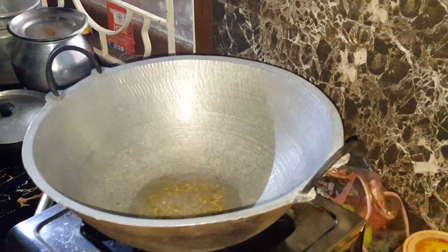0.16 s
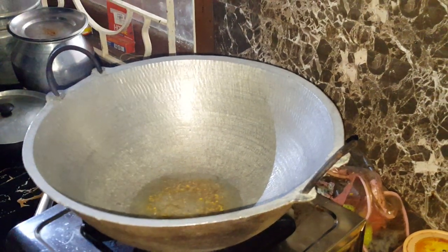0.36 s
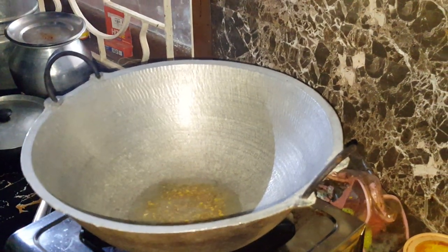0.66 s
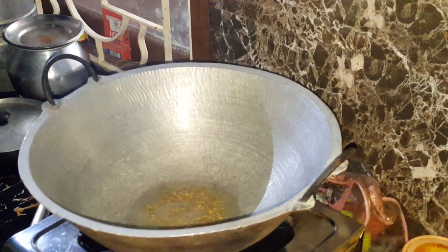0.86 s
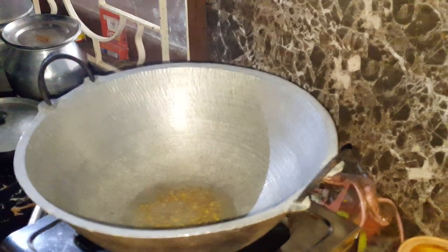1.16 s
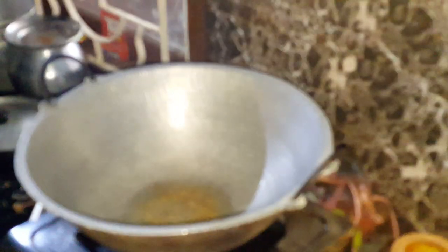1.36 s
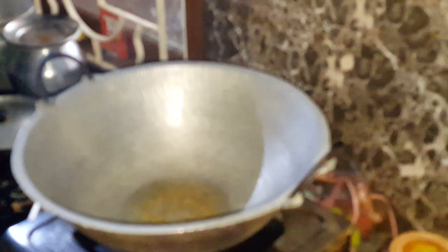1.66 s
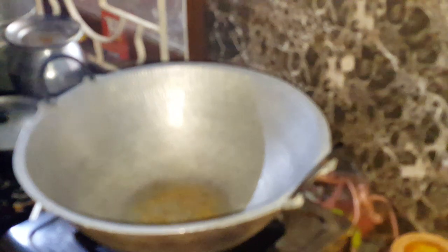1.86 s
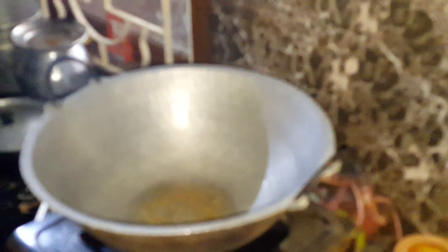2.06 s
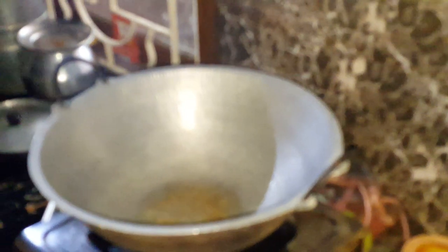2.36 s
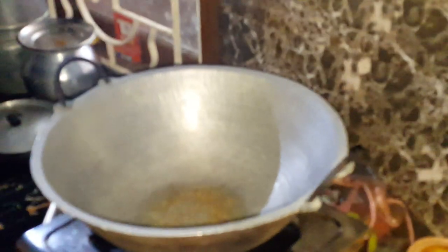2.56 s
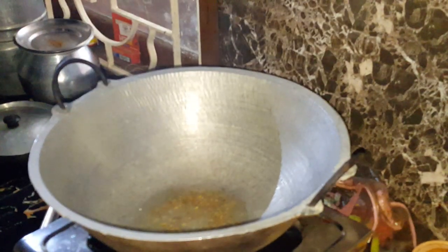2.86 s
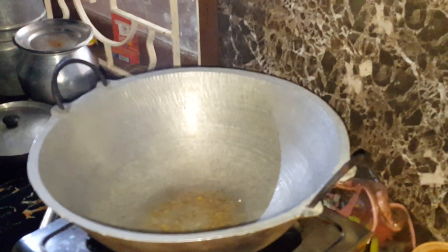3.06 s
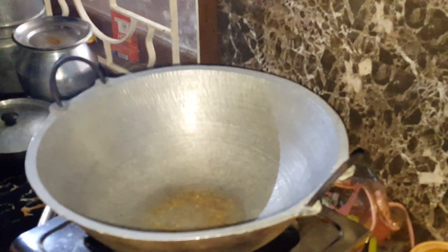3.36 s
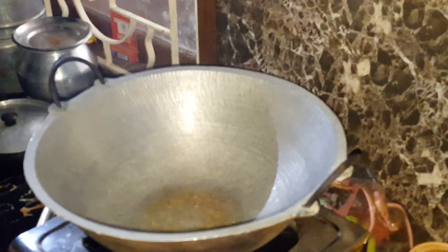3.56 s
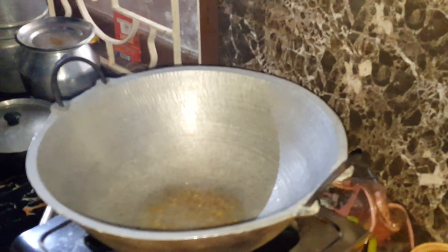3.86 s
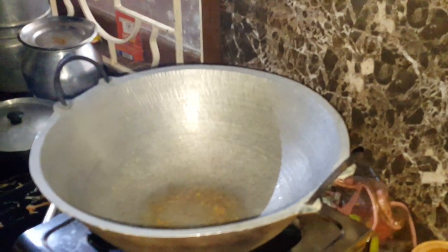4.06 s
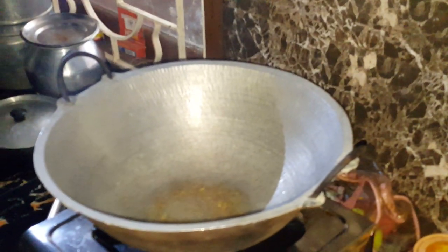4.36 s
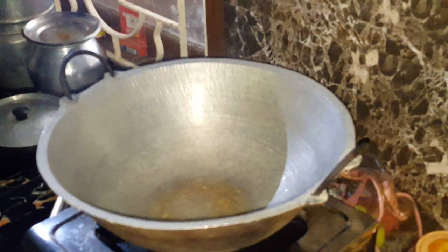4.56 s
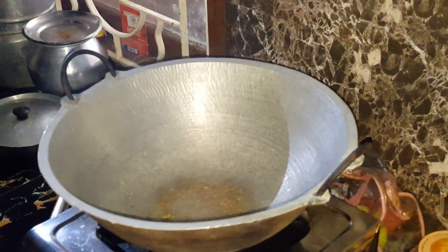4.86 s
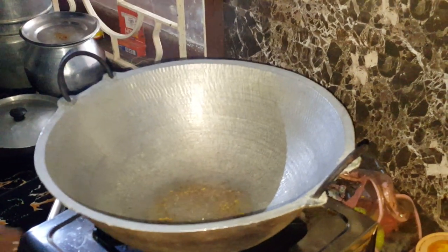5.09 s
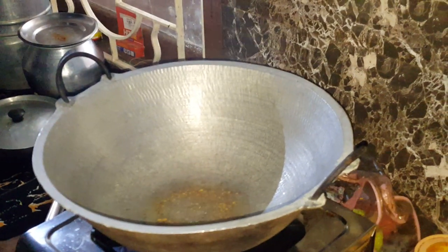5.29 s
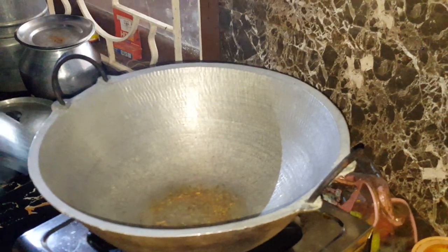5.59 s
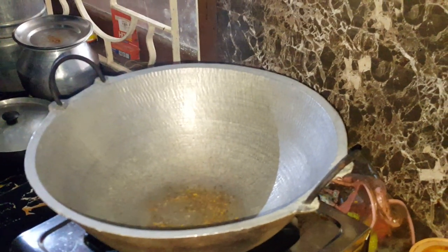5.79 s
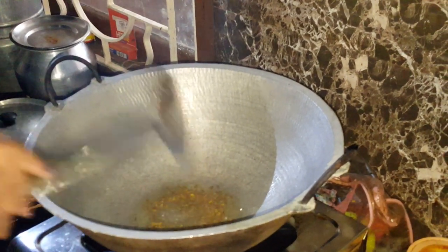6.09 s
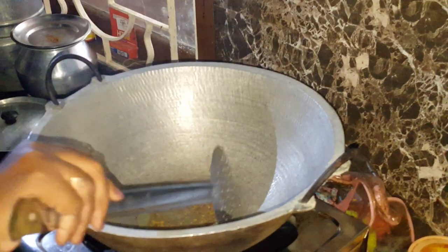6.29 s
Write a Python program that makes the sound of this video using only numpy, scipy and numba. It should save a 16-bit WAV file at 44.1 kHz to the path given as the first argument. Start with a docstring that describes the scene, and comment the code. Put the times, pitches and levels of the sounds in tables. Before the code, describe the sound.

Close in a small hard-walled kitchen, seeds splutter in hot oil in a wide metal pan. A few scattered spits come first, with a dull bump far off, then the crackle thickens into constant bright pops over fine sizzle. A faint wavering whistle joins midway. The popping eases slightly before a ladle knocks the pan at the very end. Soft gas flame and room air lie underneath; the phone microphone is just above the rim.

```python
"""Seeds spluttering in hot oil

Steam bubbles burst as short pitched spits over a swarm of finer sizzle: damped sines with sharp cracks.
Husks pop as dull pressure pulses, the oil gurgles once, and bowl and tiled walls smear each burst in noise.
A ladle strikes the pan's ringing modes at the end; behind lie a far bump, a narrow wavering whistle,
and the gas flame and kitchen air as coloured noise. A phone above the rim rounds the peaks."""
import sys
import numpy as np
from scipy import signal
from scipy.fft import rfft, irfft, next_fast_len
from scipy.io import wavfile
from scipy.ndimage import uniform_filter1d
from numba import njit

SR = 44100
rng = np.random.default_rng(int(sys.argv[2]) if len(sys.argv) > 2 else 0)


def generate_wav(sig):
    """Save sig (samples, or channels by samples) to the path in sys.argv[1] as 16-bit PCM at SR."""
    pcm = np.round(np.clip(np.atleast_2d(sig).T, -1, 1) * 32767).astype(np.int16)
    wavfile.write(sys.argv[1], SR, pcm)


N = 283563

# clearest bursting steam bubbles, before the size ceiling and gains:
# start_s [s], level_db [dB], pitch_hz [Hz], crack_db [dB relative to the blip]
CLEAR_BURSTS = [(0.063, -32.5, 4290, -12), (0.0842, -47, 4330, -24), (0.2567, -17.5, 2460, -21),
                (0.3364, -10, 4760, -8.5), (0.4449, -16.5, 2250, -29), (0.4656, -12, 4600, -20),
                (0.4882, -17, 5800, -14), (0.5186, -12.5, 8440, -21), (0.637, -16, 10000, -2.5),
                (0.7148, -25.5, 9310, 5.5), (0.8873, -15, 2200, 0.5), (1.0077, -19, 5360, -13),
                (1.068, -17, 5300, -19), (1.108, -20, 5600, -11), (1.1309, -23, 5600, 5.5),
                (1.1806, -17, 4270, -12), (1.2047, -19, 5700, -8), (1.2333, -14, 5000, 1),
                (1.273, -7.5, 4450, -31), (1.3551, -17, 5650, 0), (1.4115, -13, 5000, -6),
                (1.4385, -12.5, 4650, -8), (1.4635, -15, 8900, 2), (1.511, -16.5, 4420, -22),
                (1.5622, -12, 3980, -27), (1.608, -11, 4440, -20), (1.6205, -11.5, 4400, -17),
                (1.6916, -15, 5540, -15), (1.721, -16, 4830, -21), (1.7699, -11.5, 4630, -14),
                (1.8367, -13, 4640, -19), (1.862, -11, 4670, -6), (1.918, -10, 4480, -13),
                (1.9649, -13, 4060, -19), (1.9928, -14, 4630, -3), (2.0184, -9.5, 5070, -6),
                (2.062, -10.5, 4700, -19), (2.078, -10, 5250, -21), (2.136, -8, 4430, -16),
                (2.165, -15.5, 4640, -19), (2.183, -14, 4560, -23), (2.248, -9.5, 4200, -2.5),
                (2.2948, -13.5, 4880, -7), (2.319, -22, 4100, -30), (2.3558, -6.5, 4400, -23),
                (2.4513, -16, 4310, -30), (2.518, -20, 4900, -28), (2.537, -5.5, 3970, -21),
                (2.574, -20, 4400, -23), (2.59, -14.5, 4950, -9), (2.615, -21, 5350, 4.5),
                (2.7077, -13.5, 4430, -22), (2.7272, -8, 4490, -12), (2.7417, -8, 4650, -19),
                (2.806, -17, 3100, -19), (2.8247, -15.5, 4600, -7), (2.883, -20, 4990, -4),
                (2.9035, -9.5, 4670, -7), (2.9275, -8, 3880, -17), (3.009, -11, 4400, -20),
                (3.039, -5.5, 4380, -35), (3.0735, -6.5, 4510, -17), (3.1176, -15, 6210, -12),
                (3.1804, -12, 4960, -29), (3.1921, -9.5, 4500, -11), (3.2963, -19.5, 4470, -29),
                (3.333, -9.5, 4360, -27), (3.3662, -9, 5460, -19), (3.3857, -19, 4520, -10),
                (3.4554, -6, 4600, -18), (3.5024, -13, 4170, -17), (3.5496, -30, 4540, -27),
                (3.5683, -13, 2980, -0.5), (3.6022, -11.5, 4260, -18), (3.636, -14.5, 4470, -13),
                (3.683, -13, 4360, -5), (3.721, -12.5, 4360, -18), (3.7893, -13, 5010, -9),
                (3.8072, -13.5, 4130, -17), (3.8513, -20, 2900, -3), (3.8681, -16, 4260, -4),
                (3.899, -19, 3780, -17), (3.92, -13, 4470, -14), (3.9436, -14, 4460, -6),
                (3.9716, -5, 4730, -15), (4.097, -12.5, 3050, -8), (4.1157, -15, 4930, -29),
                (4.1305, -14, 4300, -22), (4.196, -23, 4300, -29), (4.214, -1, 3000, -24),
                (4.268, -16.5, 5290, -19), (4.3196, -10.5, 4430, -11), (4.3705, -16, 5080, -20),
                (4.434, -17, 4330, -22), (4.4578, -13, 4490, -13), (4.4709, -13, 2960, -20),
                (4.5027, -23, 4430, -25), (4.5248, -9.5, 4400, -6), (4.585, -10.5, 2760, -26),
                (4.6532, -17, 4130, -15), (4.6866, -9.5, 4220, -16), (4.7145, -36, 4500, -7),
                (4.7696, -15, 2880, -21), (4.816, -11, 4080, 2), (4.8574, -12.5, 4290, -5),
                (4.8924, -10, 4620, -14), (4.9208, -10, 4200, -27), (5.016, -9, 3100, -30),
                (5.0729, -9.5, 4800, -25), (5.1208, -10, 5170, -9), (5.1854, -21.5, 4600, 8),
                (5.2151, -16.5, 4460, -2), (5.256, -13.5, 4540, -10), (5.2904, -19, 2890, -24),
                (5.3154, -12.5, 3200, -12), (5.3464, -17.5, 2880, -8), (5.4445, -13.5, 4230, -19),
                (5.4717, -14, 4800, -17), (5.5032, -11, 4200, -16), (5.556, -18, 4300, -28),
                (5.5958, -14, 4430, -19), (5.6368, -14, 4560, -18), (5.7176, -17.5, 5240, -14),
                (5.745, -12, 3780, -7), (5.8158, -17, 4290, -13), (5.864, -20, 4700, 0),
                (5.885, -16.5, 3000, -5.5), (5.9158, -24, 2980, 4.5), (5.9618, -23, 4280, -24),
                (5.9744, -9, 3900, -12), (6.0432, -11, 4260, -5), (6.096, -21.5, 4530, -25),
                (6.1854, -18.5, 3840, -36), (6.2164, -13.5, 4230, -22), (6.3237, -19.5, 3060, -20)]
# level of the sizzling swarm under the spits, before stirring and gains:
# time_s [s], level_db [dB], treble_db [dB relative to body]
SWARM_LEVEL = [(0.0, -20.5, -14), (0.25, -44.5, 6.5), (0.5, -40, 1.5), (0.75, -52, 14.5), (0.93, -33.5, -3),
               (1.12, -55, 14), (1.43, -40, 8), (2.17, -29.5, -1.5), (2.99, -29.5, -2), (4.06, -27.5, -5.5),
               (4.75, -28, -4.5), (5.5, -31.5, -6), (6.2, -36.5, -3), (6.43, -29, -16)]
# ladle on the wall, then its rattles, before gains: start_s [s], level_db [dB]
LADLE_TOUCHES = [(6.349, -21.5), (6.353, -35), (6.357, -42), (6.366, -36)]
# colour of bowl mouth and microphone: freq_hz [Hz], gain_db [dB]
BOWL_COLOUR = [(100, -5), (1000, -3), (2000, -4.5), (3000, 0.5), (3600, -2.5), (4500, 4.5), (5500, 4),
               (7000, 1.5), (8800, 7), (10200, -1.5), (13000, 2), (16000, -2.5)]

BIGGEST_DB = -7  # ceiling on all bursts, before gains
RIGHT_LAG = 2  # samples by which the right channel trails for a centred sound
SIDES = np.array([[1], [-1]])  # opposite signs left and right


def undb(db):
    """Decibels to amplitude."""
    return 10 ** (np.asarray(db) / 20)


def curve(table):
    """Columns of a table joined over time."""
    s, *columns = np.transpose(table)
    return [np.interp(np.arange(N) / SR, s, c) for c in columns]


def unit(x):
    """Scales to an RMS of one."""
    return x / np.sqrt(np.mean(x ** 2))


def colour(x, points):
    """Weights the spectrum by (Hz, dB) points joined over log frequency."""
    hz, db = np.transpose(points)
    n = next_fast_len(x.shape[-1] + SR // 4)
    f = np.maximum(np.arange(n // 2 + 1) * SR / n, 1)
    gain = undb(np.interp(np.log(f), np.log(hz), db))
    return irfft(rfft(x, n) * gain, n)[..., :x.shape[-1]]


def butter(x, order, hz, kind):
    """Butterworth filter."""
    return signal.sosfilt(signal.butter(order, hz, kind, fs=SR, output="sos"), x)


def ring(x, hz, t60):
    """One damped mode, falling 60 dB in t60 seconds."""
    p = np.exp(2j * np.pi * hz / SR - np.log(1000) / (t60 * SR))
    return signal.lfilter([1], [1, -p], x).imag


def hiss(hz, width_hz):
    """Noise in one resonance."""
    return unit(ring(rng.standard_normal(N), hz, np.log(1000) / (np.pi * width_hz)))


def logit_scatter(u):
    """Turns uniform chance into a centred, bell-like scatter."""
    return np.log((u + .02) / (1.02 - u)) / 2


def fading(at, db, tau_s):
    """Power that jumps at each event and dies away."""
    x = np.zeros(N)
    np.add.at(x, (np.asarray(at) * SR).astype(int), undb(2 * np.asarray(db)))
    return signal.lfilter([1], [1, -np.exp(-1 / (tau_s * SR))], x)


def pushes(table, width_s):
    """One-sided pressure pulses, each peaking width_s after its start."""
    x = np.zeros(N)
    at, db = np.transpose(table)
    np.add.at(x, (at * SR).astype(int), undb(db))
    t = np.arange(SR // 100) / (SR * width_s)
    return np.convolve(x, t * np.exp(1 - t))[:N]


@njit
def grains(at, hz, cycles, rise, lag, left, right, n, sr):
    """Damped sines that swell over some cycles, last a few more and climb in pitch as the bubble opens."""
    out = np.zeros((2, n + 16))
    for k in range(len(at)):
        i = int(at[k] * sr)
        w, a, shut, phase = 2 * np.pi * hz[k] / sr, 1., 1., 0.
        fade = np.exp(-hz[k] / (cycles[k] * sr))
        opening = np.exp(-hz[k] / (rise * sr))
        while a > .003 and 4 <= i < n:
            v = (a - shut) * np.sin(phase)
            out[0, i] += left[k] * v
            out[1, i + lag[k]] += right[k] * v
            phase += w
            w = min(w * 1.001, 2.7)  # pitch climbs 0.1 % a sample up to a limit
            a *= fade
            shut *= opening
            i += 1
    return out[:, :n]


def bubbles(at, hz, db, place, cycles, rise):
    """Grains placed across the oil, 0 (right) to 1 (left), by level balance and delay between the ears."""
    pan_db = -1.5 + 8 * (place - .5)
    lag = np.round(RIGHT_LAG + 5 * (place - .5)).astype(np.int64)
    hz = np.clip(hz, 100, .42 * SR)
    left, right = undb(db + pan_db / 2), undb(db - pan_db / 2)
    return grains(at, hz, cycles + 0 * at, max(rise, .01), lag, left, right, N, 1. * SR)


def stirring():
    """Each clear burst stirs up small bubbles for a while; the swarm calms in the pauses."""
    stir_s, stir_power = 0.026, 0.2
    at, db = np.transpose(CLEAR_BURSTS)[:2]
    recent = fading(at, np.minimum(db, BIGGEST_DB), stir_s) + 1e-6
    return (recent / uniform_filter1d(recent, SR // 2)) ** stir_power


def bursts():
    """The clear bursts, the smaller one each sets off, and lesser ones that fall by chance."""
    follows_s, follower_db = .025, -8  # typical delay, level below the clear burst
    lesser_per_s, lesser_db, lesser_spread_db = 11, 10.5, 4  # rate, size over the swarm level, scatter
    lesser_hz, lesser_octaves = 4020, 0.32  # usual pitch and its scatter

    def crack_db(chance):
        return -13 + 4 * logit_scatter(chance)

    at, db, hz, _ = np.transpose(CLEAR_BURSTS)
    late, size, tune, crack = rng.random((len(at), 4)).T
    follower = [at + follows_s * (.4 + late),
                np.minimum(db, BIGGEST_DB) + follower_db + 3.3 * logit_scatter(size),
                np.minimum(hz, lesser_hz) * 2 ** (0.18 * logit_scatter(tune)),
                crack_db(crack)]

    when, size, tune, crack = rng.random((int(lesser_per_s * N / SR), 4)).T
    i = (when * (N - 1)).astype(int)
    db = curve(SWARM_LEVEL)[0][i] + 20 * np.log10(stirring()[i])  # size follows the swarm
    db = db + lesser_db - lesser_spread_db * np.log(size + 0.066)
    lesser = [i / SR, db, lesser_hz * 2 ** (lesser_octaves * logit_scatter(tune)), crack_db(crack)]
    return np.hstack([np.transpose(CLEAR_BURSTS), follower, lesser])


def spits():
    """Each burst is a pitched blip, a sharp crack with its bounce off the bowl, and droplets that fall back."""
    bounce_s = .0013
    at, db, hz, crack_db = bursts()
    db = np.minimum(db, BIGGEST_DB)
    crack_db = db + crack_db
    chance = rng.random((len(at), 21))
    place = chance[:, 0]
    out = bubbles(at, hz, db + 8, place, cycles=1.27 + 0.51 * chance[:, 1], rise=0.88)
    crack_hz = 7000 + 5000 * chance[:, 2]
    out += bubbles(at, crack_hz, crack_db + 17.5, place, cycles=0.22, rise=0.035)
    bounce_hz = 8000 + 5000 * chance[:, 3]
    out += bubbles(at + bounce_s, bounce_hz, crack_db + 3.0, chance[:, 4], cycles=1.0, rise=.03)
    for k in range(4):  # droplets
        late, size, tune, place = chance[:, 5 + 4 * k:9 + 4 * k].T
        lands = at + bounce_s + 0.014 * late ** 2
        drop_hz = hz * 2 ** (0.98 * (tune - .5))
        out += bubbles(lands, drop_hz, db + 0.5 - 5 * size, place, cycles=1.27, rise=0.23)
    return out


def sizzle():
    """A dense swarm of small bubbles of scattered size, with finer cracks above."""
    bubbles_per_s, spread_db = 900, 3.5
    usual_hz, spread_octaves = 3910, 0.48
    db, treble_db = curve(SWARM_LEVEL)
    chance = rng.random((int(bubbles_per_s * N / SR), 6))
    at, place = chance[:, 0] * (N - 1) / SR, chance[:, 4]
    size_db = -spread_db * np.log(chance[:, 1] + 0.0087)
    octave = spread_octaves * 2.565 * (chance[:, 2] + chance[:, 3] - 1)
    body = bubbles(at, usual_hz * 2 ** octave, size_db, place, cycles=1.5, rise=0.99)
    crack_hz = 7500 + 7000 * chance[:, 5]
    cracks = bubbles(at, crack_hz, 1.92 * size_db, place, cycles=0.21, rise=0.049)
    return stirring() * undb(db - 3.5) * (unit(body) + undb(treble_db) * unit(cracks))


def gurgle():
    """A few large slow bubbles make a soft gurgle in the oil."""
    # large bubbles, before colouring: start_s [s], level_db [dB], pitch_hz [Hz]
    slow_bubbles = [(2.186, -20, 1010), (2.2, -20, 940), (2.245, -32, 424)]
    at, db, hz = np.transpose(slow_bubbles)
    return bubbles(at, hz, db, .5 + 0 * at, cycles=1.9, rise=0.24)


def husk_pops():
    """Splitting husks give dull pops: short one-sided pressure pulses."""
    # splitting husks, before a common gain: start_s [s], level_db [dB]
    splits = [(0.3369, -28), (0.5326, -21), (0.6374, -24), (0.7293, -22.5), (0.7957, -30.5), (1.2493, -24),
              (1.5237, -29.5), (1.5926, -27), (1.8621, -26), (2.044, -31), (2.1424, -21.5), (2.3914, -20),
              (2.6023, -20), (2.8119, -27), (2.8832, -31.5), (2.9051, -20), (3.0111, -20), (3.1934, -26.5),
              (3.5699, -26), (3.7017, -24), (3.8524, -26), (4.2373, -31), (4.5497, -22), (5.1198, -18),
              (5.7984, -25), (5.8567, -25), (5.8854, -14), (5.9762, -25), (6.0048, -23)]
    return undb(6.0) * pushes(splits, width_s=.000055)


def pan_wall(blows):
    """The pan's modes ring when driven; each leaves the wall in its own direction."""
    # modes of the pan wall: freq_hz [Hz], gain_db [dB], t60_s [s to fall 60 dB]
    modes = [(240.7, -22, 0.46), (357, -68, 0.58), (394.4, -11.5, 1), (498, -9, 0.99), (609, -2.5, 0.17),
             (619, -7.5, 0.81), (884, -9.5, 0.2), (990, -24, 0.29), (1390, -38, 0.26), (1950, -3, 0.059),
             (3000, -13, 0.098), (3670, -2, 0.099), (4220, 7.5, 0.071), (5670, -3, .04), (7400, 2, .04)]
    side_db = 4.0 * rng.standard_normal(len(modes))
    return sum(undb(db + s * SIDES / 2) * ring(blows, hz, t60) for (hz, db, t60), s in zip(modes, side_db))


def clatter(tau_s, db):
    """Noise that bursts at each touch of the ladle and fades."""
    power = fading(*np.transpose(LADLE_TOUCHES), tau_s)
    return np.sqrt(power) * rng.standard_normal((2, N)) * undb(db)


def pan_metal(boiling):
    """The boiling oil shakes the wall's low modes a little; the ladle hits it hard and scrapes on."""
    shaking = butter(boiling, 2, 900, "low")
    ladle = pushes(LADLE_TOUCHES, width_s=.00005)
    scrape = colour(clatter(tau_s=0.0062, db=0.0), BOWL_COLOUR)
    # the many close modes of the wall blur into a low rattle
    rattle = butter(clatter(tau_s=0.035, db=13.5), 2, [280, 900], "band")
    knock = ladle * undb(15)
    return pan_wall(ladle * undb(-11.5) + shaking * undb(-46.5)) + knock + scrape + rattle


def smear(x):
    """Dense echoes of bowl and walls: noise that follows the fading power of each band.

    Every burst sits elsewhere, so its echoes fall anew. The bass reaches both ears alike, the treble not."""
    size, hop = 192, 48  # samples
    frames = dict(fs=SR, nperseg=size, noverlap=size - hop)
    hz, _, z = signal.stft(x, **frames)
    power = 0
    for t60, db in (0.04, -7.5), (0.16, -3.5):  # bowl, then walls: s, dB
        keep = np.exp(-2 * np.log(1000) * hop / (t60 * SR))
        power = power + undb(2 * db) * signal.lfilter([0, 0, 1 - keep], [1, -keep], np.abs(z) ** 2)
    mid, side = signal.stft(rng.standard_normal((2, N)), **frames)[2]
    alike = .95 * np.exp(-hz / 900)[:, None]
    ears = np.array([np.sqrt(1 + alike) * mid + s * np.sqrt(1 - alike) * side for s in (1, -1)])
    echo = ears / np.sqrt(np.mean(np.abs(ears) ** 2)) * np.sqrt(power)
    return signal.istft(echo, **frames)[1][:, :N]


def bump():
    """A dull blow rooms away, heard mostly as ringing furniture and walls: swelling, fading resonant noise."""
    # resonances of the far blow, relative levels: freq_hz [Hz], width_hz [Hz], level_db [dB]
    resonances = [(126, 22, -35), (222, 23, -7), (259, 9.3, 6), (310, 57, 4), (373, 50, 9.5), (438, 36, 5),
                  (493, 34, 9), (680, 100, -7.5), (1125, 200, 3), (1840, 1500, 2.5)]
    start_s, rise_s, hold_s, t60_s, level_db = 0.835, 0.028, 0.079, 0.61, -29
    mid, side = (unit(sum(undb(db) * hiss(hz, w) for hz, w, db in resonances)) for _ in range(2))
    t = np.arange(N) / SR - start_s
    fade = undb(-60 * np.maximum(t - rise_s - hold_s, 0) / t60_s)
    shape = np.clip(t / rise_s, 0, 1) ** 2 * fade
    thud = shape * undb(level_db) * (mid + undb(-7.0) * side * SIDES)
    return butter(thud, 4, 105, "high")


def whistle():
    """A narrow noisy whistle sets in and flutters at random, its level following the boiling."""
    # whistle level before stirring, from its onset on: time_s [s], level_db [dB]
    loudness = [(2.6, -60), (3.15, -44), (3.3, -44.5), (3.9, -46), (4.1, -39.5), (4.9, -42), (5.5, -42.5),
                (6.1, -44), (6.39, -50), (6.42, -16)]
    pitch_hz, width_hz = 1338, 34
    bed_db, flutter_s = -11.5, 0.008  # steady noise under the flutter, Gaussian width of a flutter
    flutters_per_s, flutter_spread_db = 22, 4
    onset_s = loudness[0][0]
    t = np.arange(N) / SR
    mid, side = hiss(pitch_hz, width_hz), hiss(pitch_hz, width_hz)
    out = undb(bed_db) * (mid + undb(2.0) * side * SIDES)
    slots = np.arange(onset_s, N / SR, 1 / flutters_per_s)
    for slot, (late, size, tune, left, right) in zip(slots, rng.standard_normal((N // 1000, 5))):
        at = slot + 0.22 * late / flutters_per_s
        near = slice(int((at - .06) * SR), int((at + .06) * SR))
        turn = 2 * np.pi * (pitch_hz + width_hz / 3 * tune) * t[near]
        envelope = undb(flutter_spread_db * size) * np.exp(-.5 * ((t[near] - at) / flutter_s) ** 2)
        # small phase offsets keep the ears only partly alike
        out[:, near] += envelope * np.sin(turn + 0.17 * np.array([[left], [right]]))
    return (t > onset_s) * undb(curve(loudness)[0]) * stirring() * out


def air():
    """Gas flame and kitchen air as noise, alike left and right in the bass, over a wavering hum."""
    # colour of the kitchen air: freq_hz [Hz], gain_db [dB]
    air_colour = [(15, -33), (25, 11), (80, 11.5), (130, 1), (180, 4), (476, 8), (887, 4.5), (2840, 6),
                  (3520, -17.5), (4610, 6), (10100, 5), (13600, -34.5), (16000, 7.5)]
    mid, side = colour(rng.standard_normal((2, N)), air_colour)
    side = colour(side, [(30, -7), (300, -11), (1500, 6.5), (16000, 5.5)])
    hum = undb(-63) * hiss(126.2, width_hz=5.4)
    return undb(-41) * unit(mid + side * SIDES) + hum


def scene():
    """Oil, husks and pan with their echoes, in front of bump, whistle and air."""
    # how strongly bowl and walls answer each band: freq_hz [Hz], gain_db [dB]
    echo_colour = [(150, -8.5), (1000, 1), (2500, 2.5), (5000, 4), (9000, 5), (15000, 2.5)]
    husk = husk_pops()
    husks = np.array([husk, np.roll(husk, RIGHT_LAG)])
    oil = colour(spits() + sizzle() + gurgle(), BOWL_COLOUR)
    metal = pan_metal(oil[0] + husk)
    # husks pop upwards, so bowl and walls answer them less
    echoes = smear(colour(oil + undb(-5) * husks + metal, echo_colour))
    # small things in a bowl radiate no deep bass
    near = butter(oil + husks + metal + echoes, 3, 150, "high")
    return near + bump() + whistle() + air()


def record(dry):
    """The phone rounds the sharpest peaks and cuts the top."""
    top_hz = 15850
    return signal.sosfilt(signal.ellip(12, .2, 90, top_hz, fs=SR, output="sos"), np.tanh(dry))


dry = scene()
out = record(dry)
generate_wav(out)
```